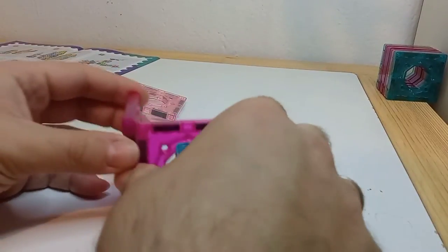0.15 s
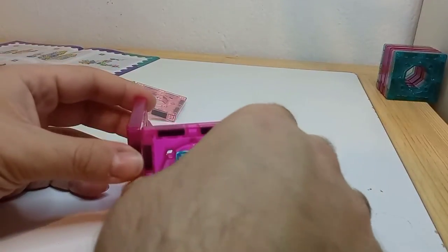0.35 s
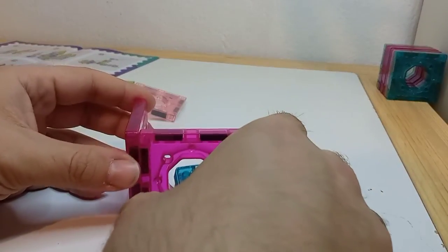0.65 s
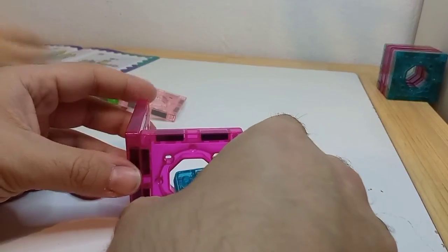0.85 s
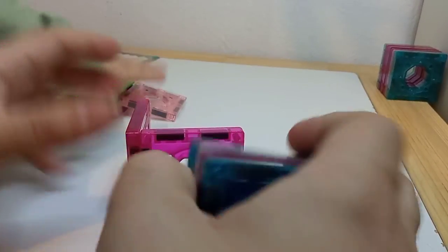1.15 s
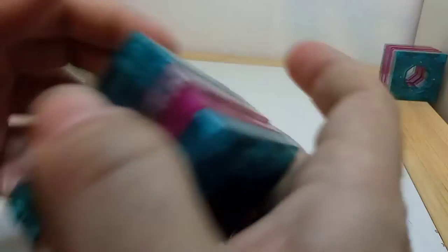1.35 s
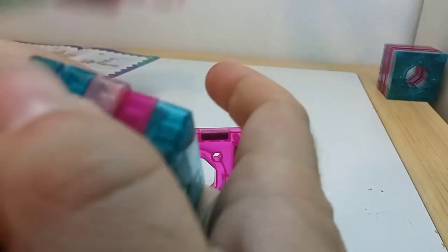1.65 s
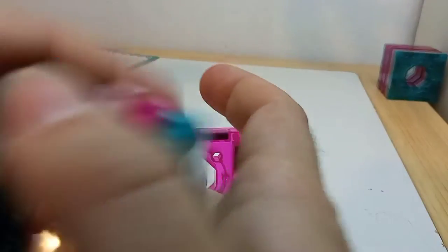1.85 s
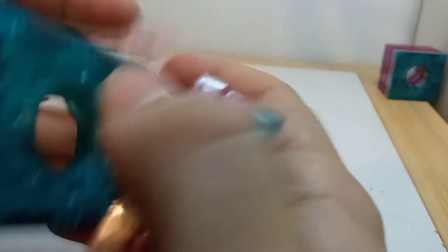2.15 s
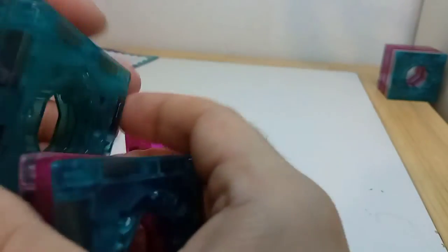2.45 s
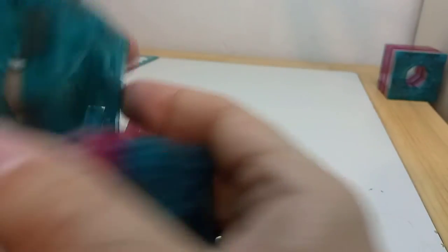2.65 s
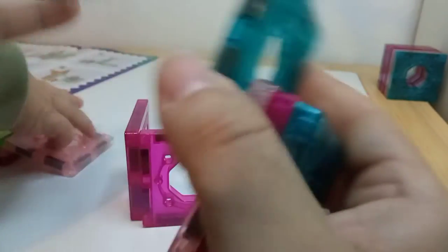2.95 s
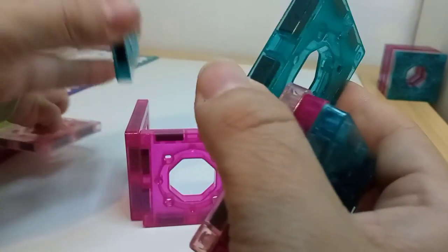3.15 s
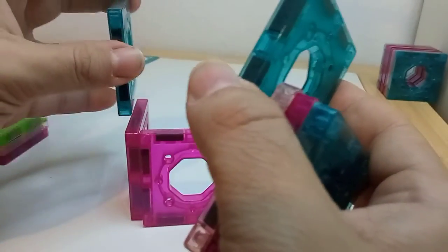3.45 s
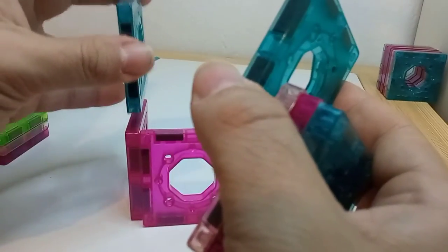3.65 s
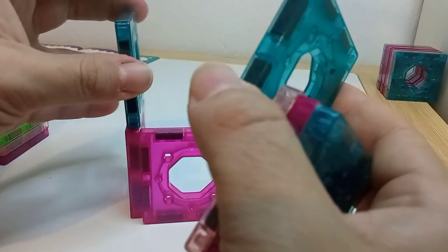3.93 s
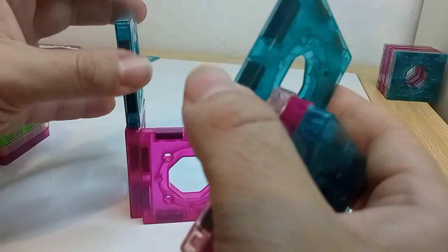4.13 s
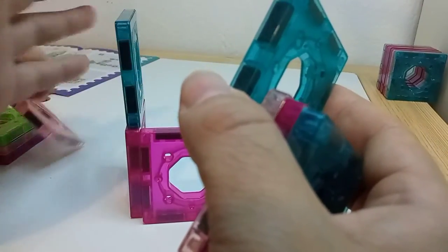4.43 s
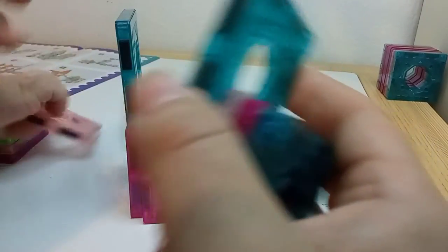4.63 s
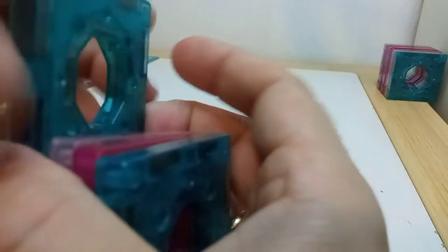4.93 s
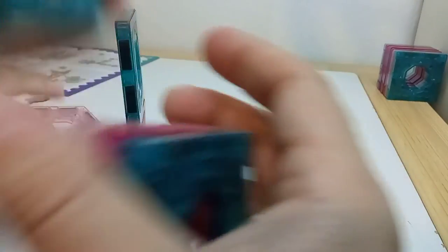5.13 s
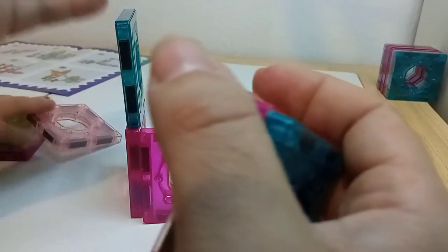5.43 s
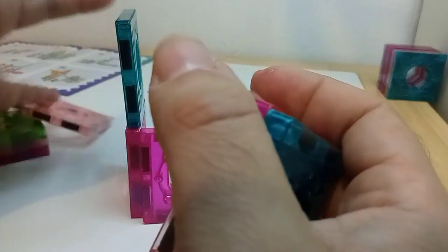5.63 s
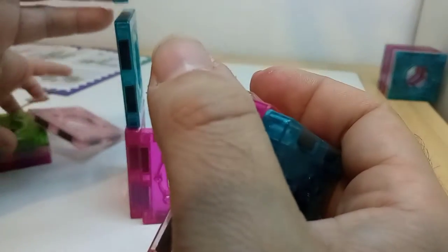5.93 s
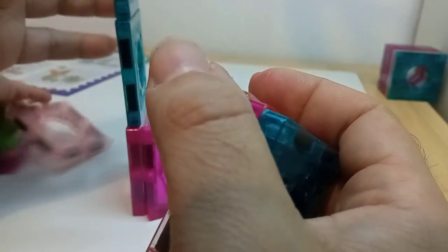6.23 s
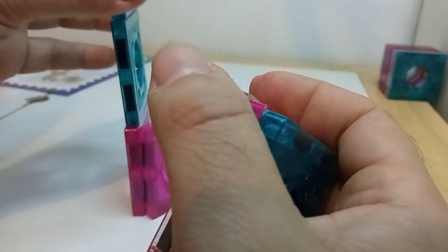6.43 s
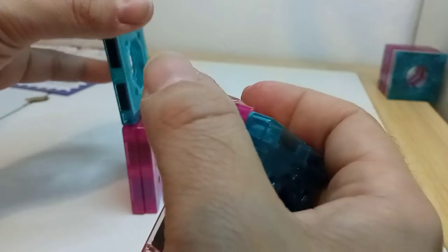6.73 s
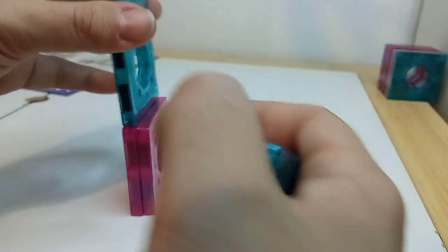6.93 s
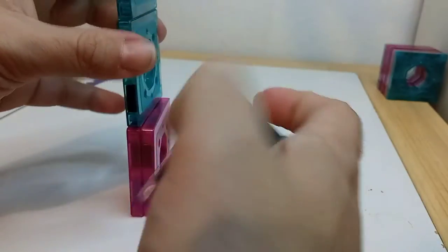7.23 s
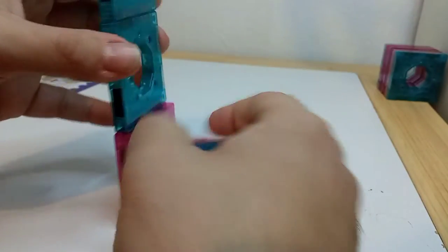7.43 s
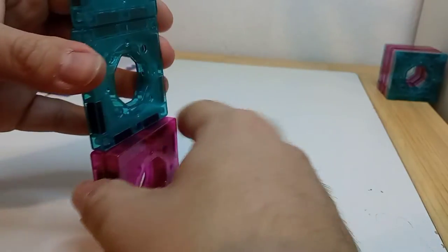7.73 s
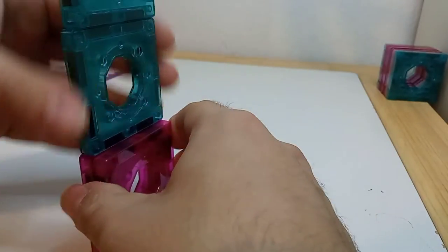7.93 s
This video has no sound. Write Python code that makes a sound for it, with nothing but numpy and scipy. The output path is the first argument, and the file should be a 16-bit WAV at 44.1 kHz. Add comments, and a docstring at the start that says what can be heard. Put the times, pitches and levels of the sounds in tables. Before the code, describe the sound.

Close to the microphone in a small, lightly reverberant room, hollow plastic magnetic tiles are handled on a table. Faint ticks and rubbing begin, with crisp clicks around 0.35-0.55 s and a short drag. From 0.6 to 2 s it is mostly quiet: a soft low scrape near 1.4 and tiny touches. Ticks resume around 2.1, then a loud cluster of snaps with a hollow table thump hits at 2.5. Tiles rattle in the hand from 2.8 to 3.3. Firm clacks and a dull scrape follow at 3.6, single snaps at 3.96 and 4.24, a bright pair at 4.6, and a lower groaning drag near 4.9. Softer ticks and slides lead to a heavy knocking snap at 6.2. A rapid, bright crackling run comes at 6.7-6.85, more snaps at 7.1, then drags, one duller snap at 7.7 and quiet scraping to the end at about 8 s.

```python
"""Magnetic tiles on a table

Hands join hollow plastic magnetic tiles on a table in a small room, close to the microphone.
Magnets snap tiles together and knock the table; tiles in the hand tick; tiles and knuckles bump the top.
Each contact is a blow ringing table and tile modes in six bands, plus room reverberation.
Dragged tiles groan and scrape, and plastic rubs: both are trains of tiny random slips, resonated."""
import sys
import numpy as np
from scipy import signal
from scipy.fft import rfft, irfft
from scipy.io import wavfile
from scipy.ndimage import uniform_filter1d

SR = 44100
rng = np.random.default_rng(int(sys.argv[2]) if len(sys.argv) > 2 else 0)


def unload_audio(sound):
    """Save the sound as a 16-bit wav file, at the path given as the first command line argument."""
    columns = np.transpose(np.atleast_2d(sound))
    # keep every value between -1 and 1, then stretch to whole-number steps
    steps = np.round(np.clip(columns, -1, 1) * 32767)
    wavfile.write(sys.argv[1], SR, steps.astype(np.int16))


N = 356416


def amp(db):
    """Decibels to gain."""
    return 10 ** (np.asarray(db) / 20)


def evened(x):
    """Scales to rms 1."""
    return x / np.sqrt(np.mean(x ** 2) + 1e-20)


def unit(x):
    """Scales to the energy of 10 ms at rms 1."""
    return x * np.sqrt(SR / 100 / np.sum(x ** 2))


def read(points, hz):
    """Reads a table along a logarithmic frequency axis."""
    f, value = np.transpose(points)
    return np.interp(np.log(hz + 1), np.log(f + 1), value)


def add(mix, start_s, sound):
    """Adds a sound to the mix at start_s."""
    part = mix[max(round(start_s * SR), 0):][:len(sound)]
    part += sound[:len(part)]


def coloured(x, colour):
    """Gives x a spectrum, at rms 1."""
    gain = amp(read(colour, np.fft.rfftfreq(len(x), 1 / SR)))
    return evened(irfft(rfft(x) * gain, len(x)))


# reverberation time: freq_hz, t60_s
ROOM = [(100, 0.32), (400, 0.33), (1500, 0.27), (5000, 0.28), (10000, 0.25), (15500, .23)]


def room(build_s=0.0035):
    """One path through the room: sparse reflections, decaying at a rate set by frequency; energy 1."""
    t = np.arange(SR // 3) / SR
    present = rng.random(len(t)) < 0.15
    taps = rng.standard_normal(len(t)) * present * (1 - np.exp(-(t / build_s) ** 2))
    hz, at_s, z = signal.stft(taps, SR, nperseg=256)
    decay = amp(-60 * at_s / read(ROOM, hz)[:, None])
    tail = signal.istft(z * decay, SR)[1][:len(t)]
    return tail / np.linalg.norm(tail)


def heard(dry, wet_db):
    """A stroke and its reverberation, scaled to hold the power."""
    out = amp(wet_db) * signal.fftconvolve(dry, room())
    add(out, 0, dry)
    return out / np.hypot(1, amp(wet_db))


def ring(modes, t, detune, damping=1):
    """Struck-body modes: sign and pitch vary with the point of contact, decay with the grip."""
    hz, db, t60_s = np.transpose(modes)[:, :, None]
    side, shift = rng.standard_normal((2, len(modes), 1))
    decay = amp(db - 60 * damping * t / t60_s)
    return (np.sign(side) * decay * np.sin(2 * np.pi * hz * (1 + detune * shift) * t)).sum(0)


# room hiss spectrum: freq_hz, relative_db_per_hz
AIR_COLOUR = [(25, 7), (100, 6.5), (250, -0.5), (600, -7.5), (2000, -11), (4200, -12), (8000, -11),
              (13000, -12), (16000, -15)]


def air():
    """Steady coloured noise: the faint hiss of the room."""
    return amp(-66) * coloured(rng.standard_normal(N), AIR_COLOUR)


def stroke(length_s, attack_s, release_s, swell_db):
    """A hand's push: it sets in, grows or eases steadily, and lets go."""
    t = np.arange(0, length_s, 1 / SR)
    fade = np.minimum(t / attack_s, 1) * np.minimum((length_s - t) / release_s, 1)
    return fade * amp(swell_db * (t / length_s - 0.5))


def waver(count):
    """Slow chance changes of the grip, at rms 1."""
    return evened(uniform_filter1d(uniform_filter1d(rng.standard_normal(count), size=2000), size=1000))


def slips(count, per_s, spread_db, catch_db):
    """Tiny slips of uneven size, in clumps as the surfaces catch and let go."""
    clumps = evened(uniform_filter1d(uniform_filter1d(rng.standard_normal(count), size=600), size=400))
    size_db = spread_db * np.minimum(rng.exponential(1, count), 3) + catch_db * np.tanh(clumps)
    return rng.choice([-1, 1], count) * amp(size_db) * (rng.random(count) < per_s / SR)


def resonate(x, hz, width_hz):
    """A resonance whose centre follows the curve hz."""
    turn = np.exp(2j * np.pi * np.cumsum(hz) / SR)
    r = np.exp(-np.pi * width_hz / SR)
    return 2 * (turn * signal.lfilter([1 - r], [1, -r], x / turn)).real


# main modes of a hollow tile, before detuning and damping: freq_hz, relative_db, t60_s
TILE = [(1965, -11, 0.029), (2670, -2.5, 0.023), (3230, -1, 0.017), (3920, -5.5, 0.028),
        (4368, -3.5, 0.033), (4966, -6.5, 0.015), (5530, -8.5, 0.026), (5690, -1, 0.011),
        (9200, -5.5, 0.016), (10100, -2.5, .015)]
# spectrum of rubbing grains: freq_hz, relative_db_per_hz
RUB_COLOUR = [(300, -10), (1200, -4), (2500, -4.5), (4300, -2.5), (6000, -1), (7600, -10), (9800, -6),
              (12500, -17.5), (15000, -13.5), (16000, -21.5)]


def rub(length_s, level_db, swell_db):
    """Fine slips ring the shell; one resonance wanders and the colour shifts as the contact moves."""
    push = stroke(length_s, attack_s=0.012, release_s=0.025, swell_db=swell_db)
    count = len(push)
    grains = coloured(slips(count, per_s=3000, spread_db=4.0, catch_db=5.0), RUB_COLOUR)
    shell = signal.fftconvolve(grains, ring(TILE, np.arange(SR // 20) / SR, detune=0.023))[:count]
    edge_hz = 3200 * np.exp(0.27 * waver(count))
    edge = resonate(grains, edge_hz, width_hz=350)
    grains = grains + amp(-8) * evened(shell) + amp(-4) * evened(edge)
    dull = signal.sosfiltfilt(signal.butter(2, 4500, fs=SR, output="sos"), grains)
    bright = grains - dull
    tilt_db = 2.0 * waver(count)
    rubbing = evened(dull * amp(-tilt_db) + bright * amp(tilt_db))
    return heard(amp(level_db) * push * rubbing, wet_db=-2.0)


# plastic on plastic and skin: start_s, length_s, level_db (mid-stroke), swell_db (over the stroke)
RUBS = [(0.0, 0.054, -51, -43), (0.183, 0.073, -47.5, -8), (0.408, 0.22, -53.5, -5),
        (1.001, 0.34, -57.5, 24.5), (1.322, 0.24, -49, 1), (1.577, 0.17, -58, 10),
        (2.762, 0.14, -58.5, 9.5), (3.187, 0.14, -52, 6.5), (3.433, 0.1, -42.5, 7),
        (3.466, 0.15, -43.5, -5), (4.331, 0.23, -58.5, -8), (5.663, 0.092, -43.5, -8),
        (5.81, 0.056, -41, 8), (5.898, 0.35, -52, 8), (6.446, 0.22, -44, -14.5), (6.805, 0.096, -29.5, -15),
        (7.252, 0.19, -55, -4), (7.482, 0.24, -53.5, -13.5), (7.828, 0.32, -60.5, 13)]


def rubs():
    """Plastic rubbing on plastic and skin, stroke by stroke."""
    out = np.zeros(N)
    for start_s, *row in RUBS:
        add(out, start_s, rub(*row))
    return out


# main modes of the table top, before detuning and damping: freq_hz, relative_db, t60_s
TABLE = [(131.3, -4, 0.098), (173.6, -1, 0.26), (248.9, 5.5, 0.17), (323.4, -2.5, 0.24), (409, -2, .1),
         (553, -4, 0.098), (726, -4, 0.034), (793, 8.5, 0.028), (947, -13.5, 0.039), (1224, -2.5, 0.041),
         (1530, -12.5, 0.097)]
# spectrum of the weaker modes around them: freq_hz, relative_db_per_hz
SHELL = [(60, 8.5), (130, 8.5), (280, 2.5), (450, -6.5), (800, 5), (1100, 6.5), (1800, 2.5), (3000, -8),
         (5000, -0.5), (6300, 0), (7700, -9.5), (9600, 2), (13200, -12.5), (15200, 5.5)]


def answer():
    """Room-gathered sound of all directions: smooth tile colour, main modes standing out."""
    t = np.arange(SR // 8) / SR
    path = room()
    modes = amp(-8) * ring(TABLE, t, detune=0.02, damping=1.7) + ring(TILE, t, detune=0.035)
    ringing = evened(signal.fftconvolve(room(), modes)[:len(path)])
    return coloured(path, SHELL) + amp(-5.5) * ringing


# thud, knock, clack, click, crack, fizz: low_hz, high_hz, t60_s (weaker modes, damping 1),
# room_db (re the band level, before wet_db)
BANDS = [(88, 652, 0.11, -5), (510, 2010, 0.023, -6), (2128, 4034, 0.066, -5), (4346, 8080, 0.035, -5),
         (8130, 12000, 0.027, -4), (11700, 15800, .02, -5.5)]


def blow(levels_db, filters, tails, wet_db, damping, chatter_db, table_db, tile_db, spike_db,
         table_modes=TABLE, tile_modes=TILE, rise_s=0.00012):
    """One edge strikes, the other seats a few ms later, the tile chatters to rest; the room answers."""
    t = np.arange(SR // 8) / SR
    modes = amp(table_db) * ring(table_modes, t, detune=0.012, damping=damping)
    modes += amp(tile_db) * ring(tile_modes, t, detune=0.02, damping=damping)
    hiss = rng.standard_normal(len(t))
    add(hiss, 2 * rise_s, [amp(spike_db)])  # the first hard touch is a single spike
    crowd = coloured(hiss, SHELL)

    touches = np.zeros(len(t))  # energy of each touch
    touches[0] = 1
    add(touches, 0.0038 * rng.uniform(0.53, 1.3), [amp(-4) ** 2])  # seating
    for touch_s in 0.008 * rng.uniform(0.27, 2.3, size=3):
        add(touches, touch_s, [amp(chatter_db) ** 2])

    attack = 1 - np.exp(-t / rise_s)
    out = np.zeros(len(tails[0]))
    for db, sos, tail, (_, _, t60_s, room_db) in zip(levels_db, filters, tails, BANDS):
        decay = amp(-60 * damping / (t60_s * SR)) ** 2  # energy kept per sample
        energy = signal.lfilter([1], [1, -decay], touches)
        direct = signal.sosfilt(sos, attack * (modes + crowd * np.sqrt(energy)))
        add(out, 0, amp(db) * unit(direct))
        out += amp(db + room_db + wet_db) * tail
    return out


def tile_levels(click_db, brightness_db, colour_db):
    """Four tile bands: a harder contact tilts them upwards, pivoting on the click."""
    return click_db + np.array(colour_db) + brightness_db * (np.arange(len(colour_db)) - 1)


# tile on tile, off the table: start_s, click_db (before the tick trim), brightness_db_per_band,
# ring_hz (mode that rings most)
TICKS = [(0.0667, -44, -1.5, 2360), (0.0961, -47, -4.5, 3660), (0.1894, -43.5, -1.5, 5200),
         (0.3341, -36, -0.5, 5500), (0.4002, -37, 7.5, 9780), (0.5132, -37, 1.5, 4470),
         (1.6711, -44, 7.5, 9870), (1.6882, -45.5, 0, 8500), (1.8341, -62.5, 15.5, 10200),
         (1.9914, -45.5, 0, 5700), (2.006, -41, -2, 10140), (2.0851, -37, -4, 2620),
         (2.1365, -28.5, -1, 3680), (2.1766, -47, -12, 2640), (2.2423, -33, -4.5, 2670),
         (2.4336, -47.5, -0.5, 2540), (2.8239, -34, 5, 10410), (2.8418, -35.5, -1, 5500),
         (2.8615, -29, -0.5, 5130), (2.8872, -32, 3.5, 7360), (2.9624, -35, -1, 4900),
         (2.9811, -31.5, 5, 10340), (2.9901, -32.5, 1, 10300), (3.1084, -54, -13, 2460),
         (3.1728, -39, 1, 4830), (3.2061, -37.5, 3.5, 5130), (3.2525, -31, 2, 9000), (3.4692, -36, 0, 2540),
         (3.5759, -40, -3.5, 3350), (3.8891, -40.5, 3.5, 5670), (3.9313, -47, -3, 5070),
         (4.2191, -34, 4.5, 5830), (4.2296, -34.5, -2, 10200), (4.3282, -43.5, 1.5, 4640),
         (4.4063, -47.5, 6, 9000), (4.4182, -47.5, 3, 5700), (4.4777, -49, 1.5, 4500),
         (4.596, -32, -3, 4300), (4.8395, -35, 6.5, 8940), (4.9953, -32, 3, 5270), (5.0134, -37.5, 2, 5850),
         (5.0451, -41, 1, 6150), (5.19, -53.5, -0.5, 3650), (5.2377, -36, 0, 3690),
         (5.2556, -35.5, -1.5, 4540), (5.2858, -41.5, -0.5, 9150), (5.3584, -45, -2, 9350),
         (5.4339, -46.5, 4.5, 4620), (5.496, -46.5, 2, 5460), (5.6545, -36, 0.5, 4700),
         (5.6966, -38.5, 3.5, 5900), (6.0008, -34, 3, 9750), (6.0923, -40, 4, 6060),
         (6.1319, -39.5, 4, 5500), (6.3462, -34.5, 3.5, 9680), (6.3753, -36, 0.5, 4700),
         (6.5902, -32, 4.5, 9800), (6.6339, -42, 6, 4640), (6.7034, -38, 1.5, 5640),
         (7.369, -44, -5.5, 3920), (7.4976, -45.5, 9.5, 6850), (8.0029, -50, -2, 5990)]
# clack, click, crack, fizz of a tick re its click level: relative_db
TICK_COLOUR_DB = [-2, 0, -5, -15.5]


def ticks(filters, tails):
    """Clear and faint touches of tile on tile; held in the hand, they barely reach the table."""
    out = np.zeros(N)
    for k, (start_s, click_db, brightness_db, ring_hz) in enumerate(TICKS + jostle_ticks()):
        tile_db = tile_levels(click_db, brightness_db, TICK_COLOUR_DB)
        levels_db = (tile_db[0] - 36, tile_db[0] - 17, *tile_db)
        favoured = (ring_hz, 4.5, 0.036)  # Hz, dB, t60 s
        tick = blow(levels_db, filters, tails[k % len(tails)], wet_db=-6.5, damping=1.1,
                    chatter_db=-12, table_db=-28.0, tile_db=-10.5, spike_db=12.0,
                    tile_modes=TILE + [favoured], rise_s=0.00034)
        add(out, start_s, amp(-2.5) * tick)  # tick trim
    return out


# mode favoured by a contact on the table, thud band: relative_db, t60_s
THUD_RING = (7, .13)
# tiles and knuckles on the table: start_s, thud_db, knock_db (before the bump trim),
# thud_hz (table mode that rings most)
BUMPS = [(0.0952, -27, -34.5, 167), (0.1076, -28.5, -61, 191), (0.2834, -33, -46.5, 245),
         (0.8518, -39.5, -57, 343), (1.3568, -35, -40, 149), (2.5452, -16, -31, 248.4),
         (3.683, -34, -18.5, 342), (3.9971, -29, -41, 257), (4.2601, -21, -35, 240),
         (4.3472, -27, -42, 190), (4.6482, -27, -34, 257), (4.812, -27.5, -42.5, 247),
         (4.9968, -31, -41.5, 270), (5.3768, -33.5, -51.5, 247), (5.5899, -21, -39, 261),
         (6.2539, -13.5, -26, 242), (6.2788, -16, -37, 222), (6.3846, -25, -36, 143),
         (7.122, -26, -54, 279), (7.916, -33.5, -44, 179)]


def bumps(filters, tails):
    """Soft bumps on the table top, which barely ring the tiles."""
    out = np.zeros(N)
    for k, (start_s, thud_db, knock_db, thud_hz) in enumerate(BUMPS):
        levels_db = (thud_db, knock_db, knock_db - 17, knock_db - 22, knock_db - 32)  # no fizz
        bump = blow(levels_db, filters, tails[-k % len(tails)], wet_db=1.5, damping=1.0,
                    chatter_db=-5, table_db=-7.5, tile_db=-27.5, spike_db=15.5,
                    table_modes=TABLE + [(thud_hz, *THUD_RING)])
        add(out, start_s, amp(-3) * bump)  # bump trim
    return out


# loose tiles jostling in the hand: start_s, length_s, level_db (mean click, before the tick trim)
JOSTLES = [(0.195, 0.042, -49), (1.409, 0.27, -60), (2.003, 0.033, -40.5), (2.261, 0.077, -56.5),
           (2.788, 0.24, -47.5), (3.051, 0.26, -49), (3.858, 0.02, -54), (5.204, 0.13, -51),
           (5.507, 0.037, -50.5)]
JOSTLE_PER_S, JOSTLE_SPREAD_DB = 36, 5


def jostle_ticks():
    """Jostled tiles touch at uneven moments, each with its own strength, hardness and favoured mode."""
    rows = []
    for start_s, length_s, level_db in JOSTLES:
        count = max(round(length_s * JOSTLE_PER_S), 1)
        for k, (when, size, hard, mode) in enumerate(rng.random((count, 4))):
            touch_s = start_s + length_s * (k + when) / count
            click_db = level_db + JOSTLE_SPREAD_DB * (2 * size - 1)
            brightness_db = JOSTLE_SPREAD_DB * (2 * hard - 1)
            ring_hz = TILE[int(mode * len(TILE))][0]
            rows.append((touch_s, click_db, brightness_db, ring_hz))
    return rows


# modes favoured by a snap, in the knock band and in the tile: relative_db, t60_s
KNOCK_RING = (5.3, 0.069)
TILE_RING = (7.2, .025)
# clack, click, crack, fizz of a snap re its click level: relative_db
SNAP_COLOUR_DB = [-4.5, 0, -5, -10.5]
# magnets joining tiles: start_s, thud_db, knock_db, click_db (before the snap trim),
# brightness_db_per_band, thud_hz, knock_hz, tile_hz (modes that ring most)
SNAPS = [(0.348, -25.5, -26, -39.5, -2, 510, 720, 4040), (0.372, -22, -32.5, -43, 4, 253, 610, 9740),
         (0.3818, -39, -53, -34, 3.5, 260, 602, 9700), (0.5273, -44, -48, -27.5, 4, 226, 1790, 4330),
         (0.5506, -30.5, -47, -23, -0.5, 236, 665, 4170), (2.4635, -21, -29.5, -38, -2.5, 134, 802, 2090),
         (2.4931, -9, -16, -18.5, -1.5, 244, 690, 5330), (2.5051, -17, -16, -15, -1, 258, 1033, 5400),
         (2.5288, -11, -11.5, -21, -5, 240, 778, 5060), (2.7277, -23, -28, -32, -0.5, 296, 746, 6070),
         (3.6228, -14.5, -12.5, -16.5, -2, 325, 830, 5570), (3.6539, -17, -20.5, -29, -8, 253, 930, 4630),
         (3.6683, -15, -20, -22, -5, 263, 905, 4400), (3.9587, -33, -32.5, -18.5, 1.5, 490, 1816, 4780),
         (4.2413, -12.5, -26.5, -24.5, 3, 246, 750, 9660), (4.601, -17.5, -27, -17, 2, 252, 1162, 4370),
         (4.6176, -14, -30.5, -25, -1, 255, 748, 4400), (4.866, -42.5, -30, -35, -4.5, 161, 1440, 5550),
         (4.8822, -37, -22.5, -22.5, -1, 145, 1100, 5730), (4.9612, -26.5, -40.5, -33, -1, 308, 606, 5920),
         (5.599, -22.5, -26, -36, -2.5, 254, 810, 3890), (6.1906, -18.5, -35.5, -19.5, 1, 224, 694, 4360),
         (6.2345, -8.5, -11.5, -16, -6, 251.3, 800, 3640), (6.2586, -17.5, -25, -28.5, 3, 240, 630, 6000),
         (6.72, -25, -29, -14.5, 2.5, 190, 667, 5070), (6.7296, -24.5, -29.5, -20, 6, 505, 624, 5700),
         (6.7523, -24, -23.5, -15, 3.5, 173, 655, 4480), (6.7767, -29, -29.5, -17, 1, 124, 1690, 5970),
         (6.782, -20, -24.5, -13.5, 0.5, 122, 1750, 5980), (6.802, -36.5, -37.5, -24, 5.5, 253, 818, 5660),
         (6.8267, -25.5, -35.5, -20, 3, 264, 595, 4900), (7.1034, -19.5, -41, -23, 2.5, 216, 640, 5160),
         (7.1405, -11, -30, -18, 3, 280, 626, 5160), (7.156, -19, -26, -23, -2, 282, 823, 4540),
         (7.7264, -19, -21, -25, -2.5, 511, 660, 4960)]


def snaps(filters, tails):
    """Magnets pull tiles together: sharp blows that ring the tiles and the table."""
    out = np.zeros(N)
    for k, row in enumerate(SNAPS):
        start_s, thud_db, knock_db, click_db, brightness_db, thud_hz, knock_hz, tile_hz = row
        levels_db = (thud_db, knock_db, *tile_levels(click_db, brightness_db, SNAP_COLOUR_DB))
        snap = blow(levels_db, filters, tails[k % len(tails)], wet_db=-1.0, damping=1.05,
                    chatter_db=-16, table_db=-12.5, tile_db=-15, spike_db=6, rise_s=0.00033,
                    table_modes=TABLE + [(thud_hz, *THUD_RING), (knock_hz, *KNOCK_RING)],
                    tile_modes=TILE + [(tile_hz, *TILE_RING)])
        add(out, start_s, amp(-1.5) * snap)  # snap trim
    return out


def contacts():
    """Ticks, bumps and snaps share the band filters and 24 room answers."""
    filters = [signal.butter(4, (low_hz, high_hz), "band", fs=SR, output="sos")
               for low_hz, high_hz, _, _ in BANDS]
    paths = [answer() for _ in range(24)]
    tails = [[unit(signal.sosfilt(sos, path)) for sos in filters] for path in paths]
    return ticks(filters, tails) + bumps(filters, tails) + snaps(filters, tails)


# spectrum of the slide, relative: freq_hz, relative_db_per_hz
SCRAPE_COLOUR = [(40, -8), (90, 3.5), (200, -5.5), (450, 8), (700, 7.5), (1000, 1), (1500, -3.5),
                 (2200, -8), (3200, -20.5), (8000, -48)]


def slide(length_s, groan_db, pitch_hz, scrape_db, swell_db):
    """Dragging makes the table groan at a pitch that wanders with the pressure, under a dull scrape."""
    push = stroke(length_s, attack_s=0.049, release_s=0.053, swell_db=swell_db)
    count = len(push)
    hz = pitch_hz * (1 + 0.1 * waver(count))
    drive = slips(count, per_s=1500, spread_db=3, catch_db=3.5)
    groan = evened(resonate(resonate(drive, hz, width_hz=75), hz, width_hz=490))
    table_ring = ring(TABLE, np.arange(SR // 8) / SR, detune=0.054, damping=1.9)
    top = signal.fftconvolve(drive, table_ring)[:count]
    scrape = coloured(evened(drive) + amp(-12) * evened(top), SCRAPE_COLOUR)
    return heard(push * (amp(groan_db) * groan + amp(scrape_db) * scrape), wet_db=-4.0)


# tiles dragged over the table: start_s, length_s, groan_db (mid-stroke), pitch_hz (centre),
# scrape_db (mid-stroke), swell_db (over the stroke)
SLIDES = [(0.4, 0.13, -40.5, 215, -42.5, -6), (0.541, 0.24, -49.5, 212, -52, -15),
          (1.098, 0.2, -64.5, 189, -66.5, 26), (1.35, 0.28, -43.5, 270, -42.5, -12.5),
          (2.776, 0.34, -55.5, 278, -57, -6), (3.146, 0.21, -47, 272, -54.5, 0),
          (3.447, 0.24, -40.5, 205, -42, 9), (4.095, 0.098, -48.5, 254, -77, -1),
          (4.83, 0.24, -34.5, 233, -40, -6.5), (5.365, 0.087, -39, 245, -49, -8.5),
          (5.67, 0.22, -50.5, 260, -45, -28), (5.827, 0.24, -37.5, 245, -38.5, -9.5),
          (6.1, 0.088, -38.5, 294, -37.5, 7.5), (6.408, 0.16, -51.5, 246, -41, -4.5),
          (6.513, 0.35, -43.5, 387, -44, 0), (7.451, 0.3, -37.5, 249, -47.5, 11),
          (7.83, 0.15, -42.5, 190, -48.5, 9), (7.986, 0.1, -45, 202, -44.5, -24)]


def slides():
    """Tiles dragged over the table, stroke by stroke."""
    out = np.zeros(N)
    for start_s, *row in SLIDES:
        add(out, start_s, slide(*row))
    return out


def scene():
    """Contacts, sliding and rubbing over the faint hiss of the room."""
    return (air() + rubs() + contacts() + slides())[None]


# noise suppressor: freq_hz, threshold_db
HUSH = [(1000, -82.5), (3000, -74.5), (6000, -69.5), (9000, -62.5), (14000, -64.5)]


def suppress(x, depth_db=7, knee_db=6):
    """Noise suppressor: bands that fall below their threshold are turned down."""
    hz, _, z = signal.stft(x, SR, nperseg=256)
    smooth = uniform_filter1d(uniform_filter1d(abs(z) ** 2, size=7, axis=1), size=3, axis=2)
    power = smooth * len(hz)
    under_db = read(HUSH, hz)[:, None] - 10 * np.log10(abs(power) + 1e-14)
    gain = amp(-depth_db * (1 + np.tanh(under_db / knee_db)) / 2)
    return signal.istft(z * gain, SR)[1][:, :N]


def record(dry):
    """Microphone: clips at full scale, passes no deep bass; then noise suppression and a band limit."""
    high_pass = signal.butter(2, 35, "high", fs=SR, output="sos")
    thin = signal.sosfilt(high_pass, np.clip(dry, -1, 1))
    low_pass = signal.firwin(301, 15750, window=("kaiser", 7), fs=SR)
    return signal.oaconvolve(suppress(thin), low_pass[None], "same")


dry = scene()
out = record(dry)
unload_audio(out)
```